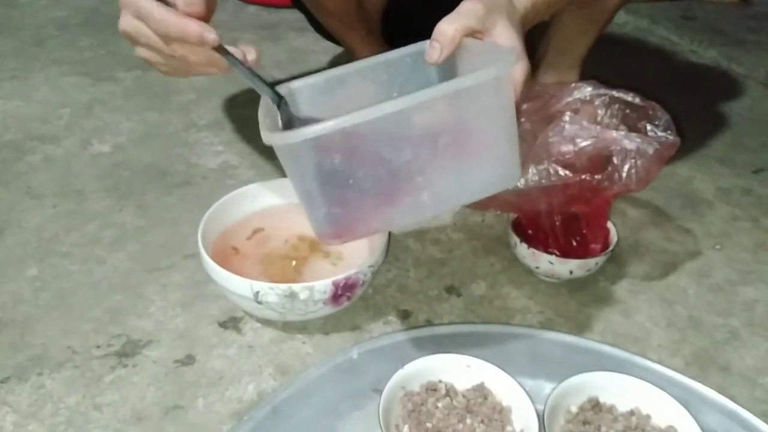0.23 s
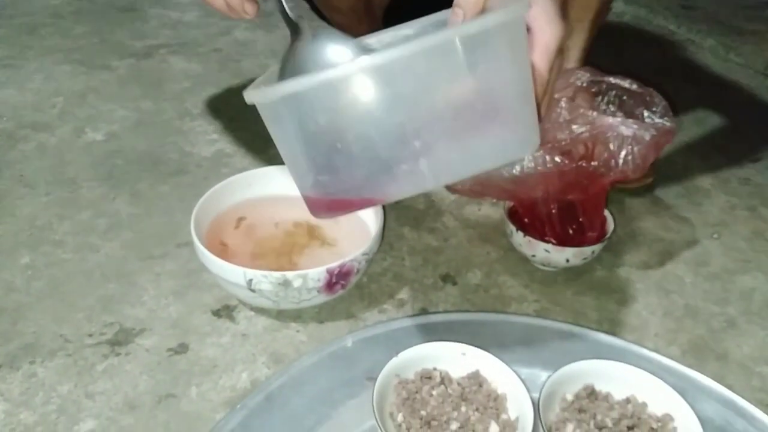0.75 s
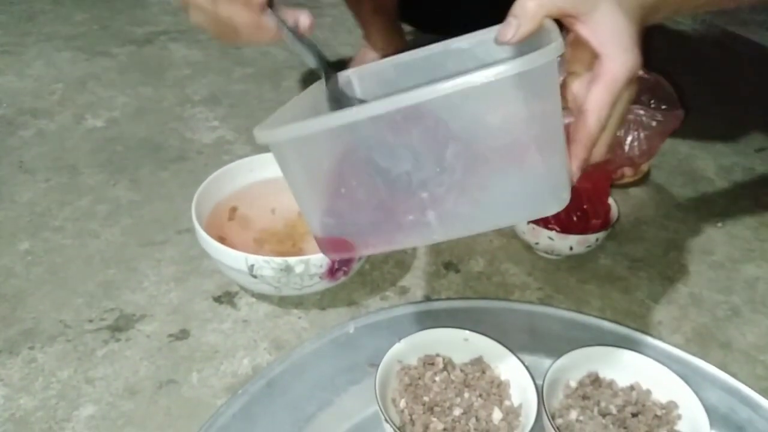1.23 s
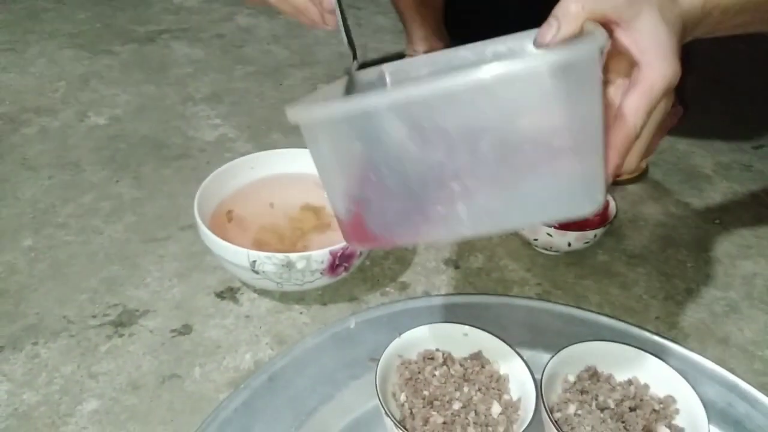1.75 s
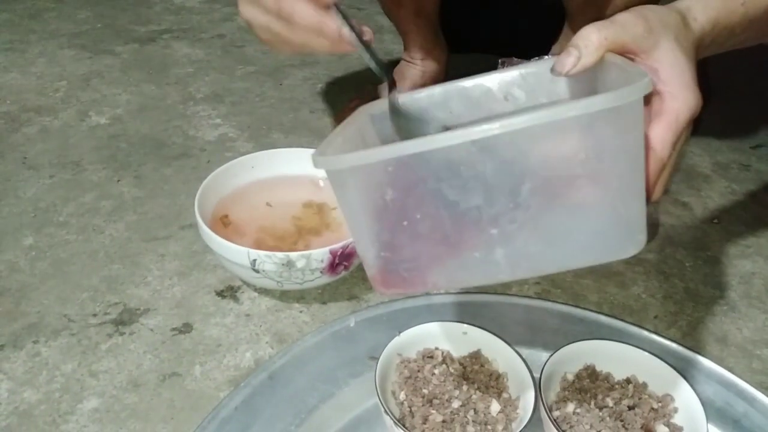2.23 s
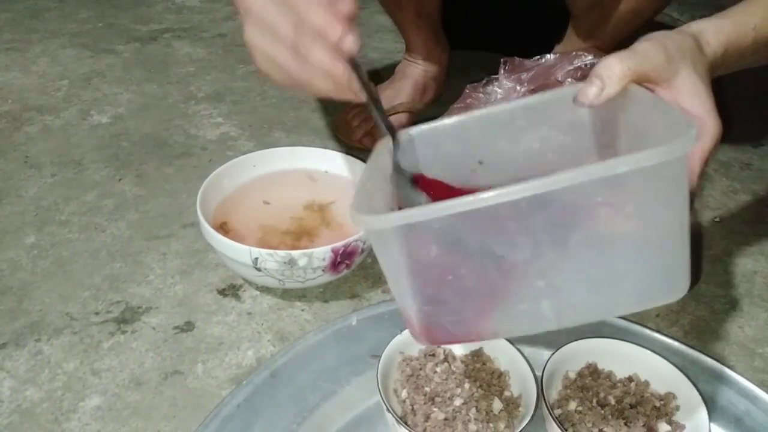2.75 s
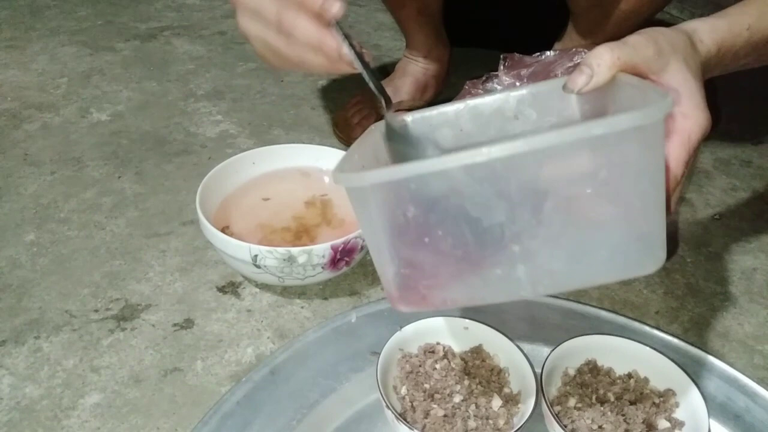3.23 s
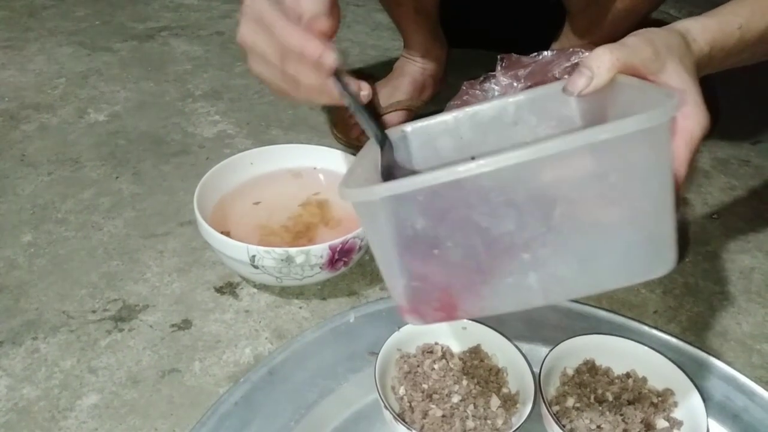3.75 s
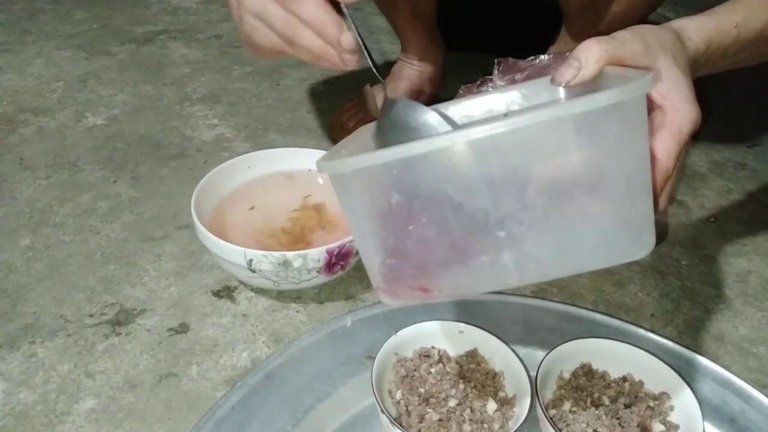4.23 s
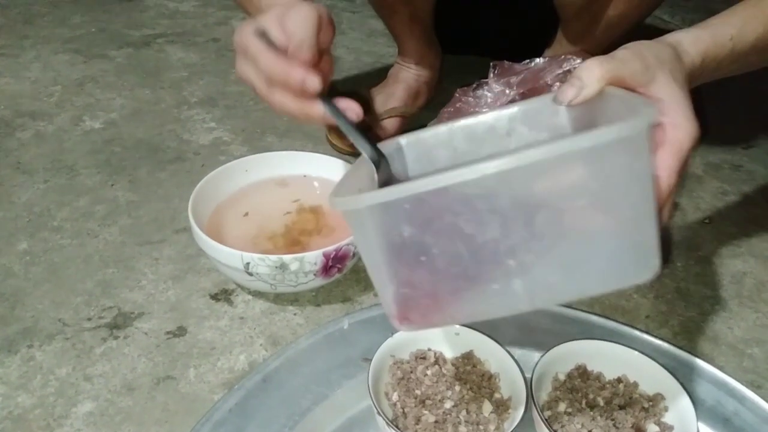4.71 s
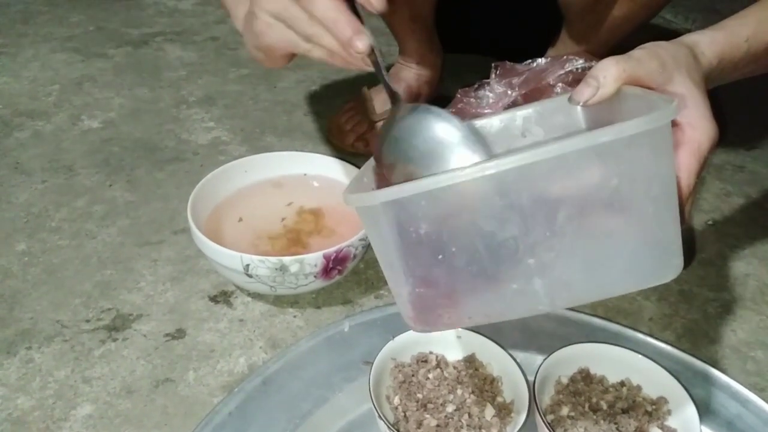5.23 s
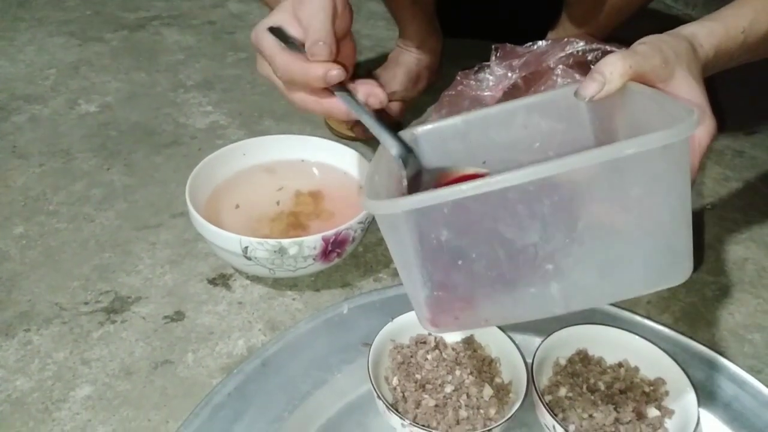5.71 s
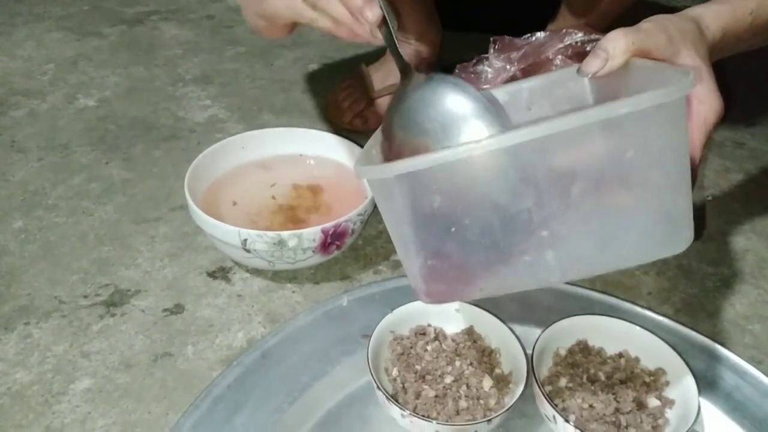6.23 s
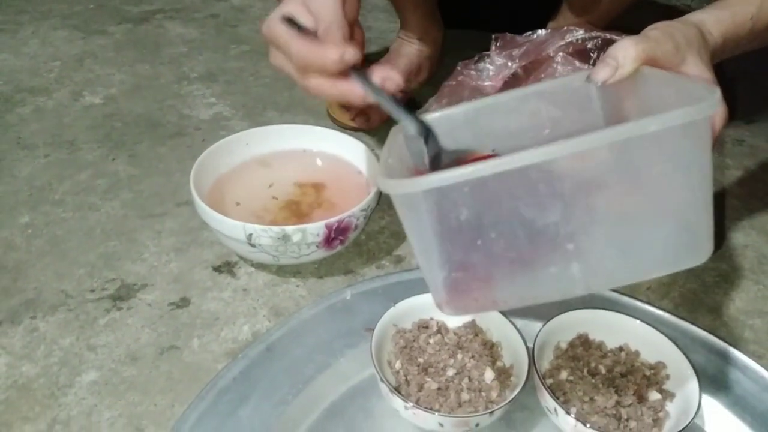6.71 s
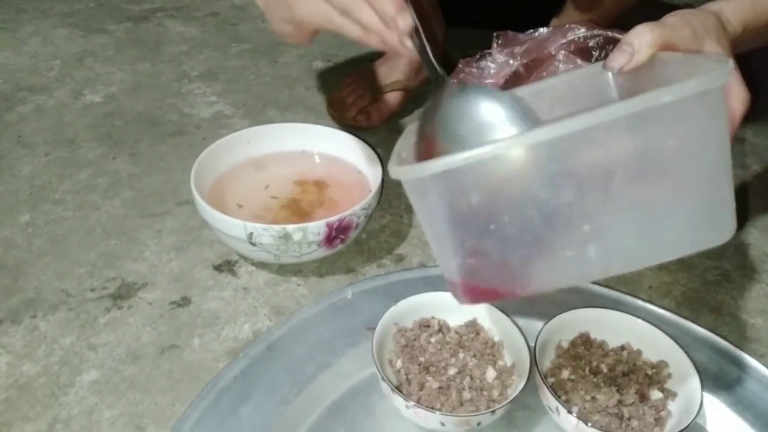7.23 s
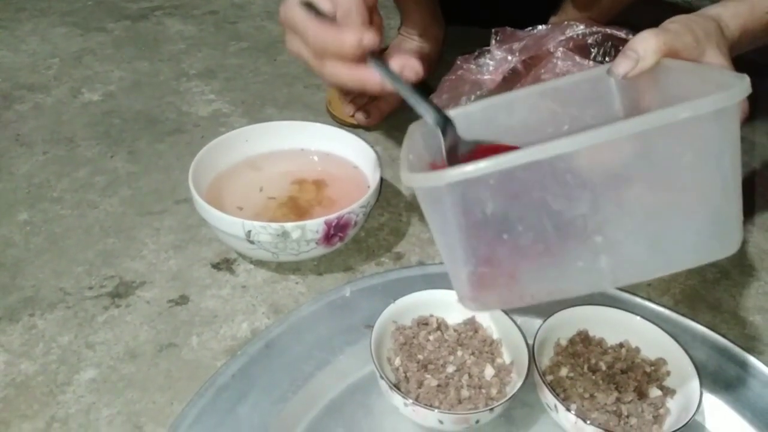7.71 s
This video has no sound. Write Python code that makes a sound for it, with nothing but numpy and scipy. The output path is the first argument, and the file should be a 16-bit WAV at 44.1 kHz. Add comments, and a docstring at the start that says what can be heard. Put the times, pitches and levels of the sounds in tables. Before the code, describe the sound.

Crickets chirr steadily behind the repeated hollow knocks, light clinks and soft scrapes of a steel spoon stirring liquid in a plastic container.

```python
"""A yard at night; crickets chirr from start to end. A steel spoon stirs red syrup in a hand-held
plastic tub, opening with a knock. Each turn, about a second long: the spoon scrapes along the wall,
taps twice, then knocks hard, flexing the wall with a low thump; nearby walls echo the knock.
After 1 s, air pockets plop in the syrup now and then, the last and loudest just after 5 s.
The stirring runs on to the end, near 8 s."""
import sys
import numpy as np
from scipy import signal
from scipy.fft import rfft, irfft, next_fast_len
from scipy.io import wavfile
from scipy.ndimage import map_coordinates

SR = 44100
rng = np.random.default_rng(int(sys.argv[2]) if len(sys.argv) > 2 else 0)


def store_pcm(level_fs):
    """Save levels as 16-bit WAV."""
    pcm = np.round(np.clip(level_fs, -1, 1) * 32767).astype(np.int16)
    wavfile.write(sys.argv[1], SR, np.atleast_2d(pcm).T)


N = 351464
TIME_S = np.arange(N) / SR
HIT_S = TIME_S[:SR // 3]  # time axis of one hit


# spoon's back on the wall: t/s, level/dB, nominal wall f/Hz
BUMPS = [(0.632, -22, 770), (2.445, -21.5, 724), (6.144, -26.5, 690), (7.081, -25, 643)]
# spoon's edge, one bounce: t/s, level/dB, nominal wall f/Hz, flight/s, bounce/dB re hit
RATTLES = [(0.722, -25.5, 630, 0.013, -3), (1.52, -24, 773, .026, -1.5), (2.541, -24, 605, .02, -6),
           (3.451, -24.5, 658, .029, -6), (4.31, -22.5, 644, .019, -6.5), (5.308, -23, 636, .026, -10.5),
           (6.273, -23, 776, 0.031, -1), (7.222, -22.5, 600, .029, -2.5)]
# hard knocks: t/s, level/dB, nominal wall f/Hz, click/dB
KNOCKS = [(0.008, -20.5, 667, -11.5), (0.879, -12, 643, -17), (1.779, -11.5, 628, -16),
          (2.68, -8, 666, -15.5), (3.589, -11, 640, -16.5), (4.515, -16, 660, -27.5),
          (5.446, -16.5, 643, -12.5), (5.458, -17, 623, -21), (6.399, -9, 653, -16),
          (7.357, -10, 647, -17.5)]
# loosely held spoon: t/s, level/dB, steel ring/dB
CLINKS = [(0.986, -30.5, -9.5), (2.779, -23.5, -8), (3.282, -27.5, -1), (3.721, -28, -7.5),
          (4.22, -21.5, -9), (4.639, -25, -12), (5.138, -31, -9)]
def spoon_hits():
    """Spoon on tub wall: soft bumps, bouncing taps, hard knocks, clinks on the rebound."""
    out = np.zeros((2, N))
    for t, db, hz in BUMPS:
        add(out, t, blow(db, hz, click_db=-17.5, steel_db=-15.5, thump_db=-15, snap_db=-41))
    for t, db, hz, flight_s, bounce_db in RATTLES:
        add(out, t, blow(db, hz, click_db=-10, steel_db=-18, thump_db=-12, snap_db=-27.5))
        bounce = blow(db + bounce_db, hz=645, click_db=-13.5, steel_db=-28, thump_db=-9.5, snap_db=-31)
        add(out, t + flight_s, bounce)
    for t, db, hz, click_db in KNOCKS:
        add(out, t, blow(db, hz, click_db, steel_db=-28, thump_db=-15, snap_db=-33))
    for t, db, steel_db in CLINKS:
        add(out, t, blow(db, hz=648, click_db=-16, steel_db=steel_db, thump_db=-14, snap_db=-29.5))
    return out


# modes before stretch: f/Hz, level/dB, t60/s
WALL_MODES = [(572, -2, 0.017), (651, 5.5, 0.034), (720, -12.5, 0.025), (985, -15.5, 0.04),
              (1090, -11, 0.018)]  # flexing wall
HOLLOW_MODES = [(508, -13, .13), (600, -9, .11), (648, 0, .17), (711, -6, .18), (762, -8, .17),
                (832, -13, .16), (927, -13, .15), (1118, -21, .12), (1368, -22, .16), (1577, -21, .14)]  # lingering hollow tones
THUMP_MODES = [(91.5, -8.5, .05), (179.1, -8, 0.18), (219, 14.5, 0.023), (216.6, -12.5, 0.21),
               (266, -2.5, 0.11), (282, -9.5, 0.025), (352.7, -9.5, .18)]  # low thump, with lingering low tones from the surrounding walls
RIM_MODES = [(1370, -5, .028), (1590, 0, .032), (1720, -5, .028), (1960, -2, .025), (2360, -1, .026),
             (2750, -2, .025)]  # stiff rim
STEEL_MODES = [(2900, -7, .02), (3120, -3, .022), (3300, 0, .035), (3460, -6, .022)]  # spoon, damped by hand and syrup
# noise spectra: f/Hz, level/dB
CRACK_SPECTRUM = [(400, -29), (900, 4.5), (1500, 3.5), (2600, 1.5), (3400, -1), (4300, -6.5), (5300, -16.5),
                  (6800, -17.5), (8500, -35), (15500, -39)]  # impact
FIZZ_SPECTRUM = [(2500, -18), (4200, -7), (5500, 5), (6800, 6.5), (8300, 2.5), (9300, -1.5), (10500, 2),
                 (12000, -7.5), (14000, -10), (15800, -19)]  # tearing syrup film; also in scrape and tick
def blow(db, hz, click_db, steel_db, thump_db, snap_db):
    """One blow cracks, rings rim and spoon, and flexes the wall with a low thump."""
    wall_stretch = (hz / 650) ** .9  # pitch depends on where the spoon lands
    wall = amp(-2.5) * ring(WALL_MODES, wall_stretch, attack_s=.0018, scatter_db=4.5)
    wall = signal.lfilter(*signal.butter(3, 470, 'high', fs=SR), wall)  # small wall radiates lows poorly
    hollow = amp(-10 + .074 * db) * ring(HOLLOW_MODES, stretch=.97, attack_s=.0091, scatter_db=3.5)
    thump = amp(thump_db + 1) * ring(THUMP_MODES, stretch=.99, attack_s=.0014, scatter_db=4)
    rim = stereo_ring(RIM_MODES, detune=.019, attack_s=.006, scatter_db=6.5)
    steel = stereo_ring(STEEL_MODES, detune=.012, attack_s=.0004, scatter_db=4)
    click = amp(click_db) * (amp(-2.5) * rim + amp(4.5) * splat(CRACK_SPECTRUM, t60_s=.016))
    clink = amp(steel_db - 4 - .17 * db) * steel  # hard blows press the spoon still
    snap = amp(snap_db + 3) * splat(FIZZ_SPECTRUM, t60_s=.022)
    impact = yard(wall + hollow + thump + click + snap, wet_db=-5.5, echo_db=.5)
    spoon = yard(clink, wet_db=-12.5, echo_db=-5)  # drier: bowl faces the microphone
    return amp(db - 2.5) * (impact + spoon)


# strokes along the wall: centre t/s, half length/s, rasp/dB, fizz/dB
STROKES = [(0.524, 0.2, -52, -70), (1.248, 0.046, -41.5, -57), (1.567, 0.14, -51, -67),
           (2.287, 0.054, -53.5, -66), (2.588, 0.064, -47.5, -55), (2.836, 0.082, -57.5, -72),
           (3.813, 0.34, -57.5, -73), (3.916, .036, -55.5, -60), (4.24, 0.046, -46.5, -56),
           (5.124, 0.15, -69, -72), (5.485, 0.1, -55.5, -69), (6.801, 0.041, -50, -57.5),
           (6.954, 0.047, -55, -73), (7.105, 0.057, -50.5, -56), (7.938, 0.047, -55.5, -75)]
# friction spectrum: f/Hz, level/dB
RASP_SPECTRUM = [(150, -35), (400, -2.5), (700, -3), (1050, -6), (1600, -2), (2300, 1), (3200, -6),
                 (4300, -2.5), (5400, -17.5), (6800, -8), (8500, -24), (12000, -30.5)]
def scrape():
    """Steel slips on wet plastic and tears the sticky film; both swell with each stroke."""
    rasp_power, fizz_power = np.zeros((2, N))
    for t, half_s, rasp_db, fizz_db in STROKES:
        pressure = (1 + ((TIME_S - t) / half_s) ** 2 / 4) ** -4
        rasp_power += amp(rasp_db) ** 2 * pressure
        fizz_power += amp(fizz_db) ** 2 * pressure
    slips = amp(.58 * wobble(890) + .79 * wobble(60))
    pops = rng.random(N) < 22 / SR  # about 22 per s
    film = amp(.92 * wobble(450)) + amp(18.5) * pops
    rasp = amp(4) * np.sqrt(rasp_power) * noise(RASP_SPECTRUM, grain=slips)
    fizz = amp(6.5) * np.sqrt(fizz_power) * noise(FIZZ_SPECTRUM, grain=film)
    return rasp + fizz


# singing slides: centre t/s, Gaussian width/s, f/Hz, level/dB
SLIDES = [(0.345, .013, 2460, -53.5), (0.603, .008, 1940, -43), (1.14, .07, 1440, -56),
          (2.501, 0.027, 4180, -47.5), (2.585, 0.063, 3390, -47), (2.62, 0.049, 4300, -51),
          (3.905, 0.034, 1955, -46), (4.162, 0.051, 1966, -48), (5.011, 0.0074, 1610, -56),
          (5.798, 0.009, 1810, -50), (6.795, 0.032, 1964, -48), (6.9, .004, 1490, -49.5),
          (7.084, 0.025, 1600, -48.5)]
def slides():
    """The sliding bowl sings briefly; uneven friction smears the tone into a narrow band."""
    out = np.zeros((2, N))
    offset_s = HIT_S - HIT_S.mean()
    for t, width_s, hz, db in SLIDES:
        white = rng.standard_normal((2, 2, len(HIT_S)))
        flutter = unit_rms(filtered(white, lambda f: 1 / (1 + (f / 110) ** 2)))
        phase = 2 * np.pi * hz * offset_s
        tone = flutter[0] * np.cos(phase) + flutter[1] * np.sin(phase)
        add(out, t - HIT_S.mean(), amp(db) * tone * np.exp(-(offset_s / width_s) ** 2 / 2))
    return out


# edge ticks: t/s, level/dB, f/Hz, sharpness/dB
TICKS = [(0.259, -37, 1890, -19), (0.4352, -31, 2410, -17), (0.5926, -31, 2030, -28),
         (1.3066, -29.5, 2790, -16.5), (1.475, -33, 2360, -34), (1.6562, -31.5, 1980, -30),
         (2.2298, -35.5, 1620, -17), (3.162, -36, 3360, -20), (4.0422, -36, 1980, -31.5),
         (4.9856, -35, 2060, -24), (5.1005, -39, 1585, -13.5), (7.888, -31, 2355, -26)]
def ticks():
    """Clear ticks of the spoon's edge, plus eight faint ones at random."""
    out = np.zeros((2, N))
    for t, db, hz, sharp_db in TICKS:
        add(out, t, tick(db, hz, sharp_db))
    for t in rng.uniform(0, N / SR, size=8):
        add(out, t, tick(db=-47.5, hz=rng.uniform(1700, 3600), sharp_db=-27))
    return out


# edge click spectrum: f/Hz, level/dB
TICK_SPECTRUM = [(300, -14), (700, 3), (1200, -6), (2300, 2.5), (3500, -2), (5500, -14), (7000, -12.5),
                 (9000, -40.5), (15500, -41)]
def tick(db, hz, sharp_db):
    """The edge catches on the plastic without flexing it."""
    ping = amp(-2.5) * unit_burst(np.sin(2 * np.pi * hz * HIT_S) * decay(t60_s=.041))
    click = splat(TICK_SPECTRUM, t60_s=.018)
    snap = amp(sharp_db + 11.5) * splat(FIZZ_SPECTRUM, t60_s=.017)
    return yard(amp(db - 10) * (click + ping + snap), wet_db=-2.5, echo_db=3)


# syrup gulps: t/s, level/dB, base f/Hz
PLOPS = [(1.066, -33, 235), (1.468, -41.5, 135), (2.191, -42.5, 346), (5.097, -28, 243)]
# bubbles per gulp: delay/s, level/dB, f/base f
BUBBLES = [(0, -2, 0.94), (.021, -1, .68), (.052, -12, .62)]
def plops():
    """Syrup gulps back into the corner: ever larger bubbles, falling pitch."""
    out = np.zeros((2, N))
    for t, db, hz in PLOPS:
        for delay_s, step_db, ratio in BUBBLES:
            add(out, t + delay_s, bubble(db + step_db, hz * ratio))
    return out


def bubble(db, hz):
    """An air pocket gulps in the thick syrup, which slaps the wall."""
    gulp = np.sin(2 * np.pi * hz * HIT_S) * decay(t60_s=.093)
    slap = amp(-5.5) * np.sin(2 * np.pi * 1.7 * hz * HIT_S) * decay(t60_s=.066)
    wall = amp(-13) * ring(WALL_MODES, stretch=.85, attack_s=.002, scatter_db=2)
    return yard(amp(db) * np.array([gulp + slap + wall] * 2), wet_db=-5, echo_db=-6.5)


# wall echoes: delay/s, level/dB
ECHOES = [(.0169, -10), (.0292, -21), (.0462, -22), (.0662, -22)]
# diffuse decay: f/Hz, t60/s
YARD_T60 = [(150, 0.51), (350, 0.49), (700, 0.32), (2200, 0.44), (6000, 0.29), (14000, 0.25)]
def yard(x, wet_db, echo_db):
    """Direct sound, echoes and tail: rough walls mirror the lows and scatter the highs."""
    hz, t, bands = signal.stft(noise([(20, 0), (20000, 0)], size=SR // 2), SR, nperseg=256)
    envelope = amp(-60 * t / along(YARD_T60, hz)[:, None]) * (1 - np.exp(-t / .00077))
    tail = signal.istft(bands * envelope, SR, nperseg=256)[1]
    tail /= np.linalg.norm(tail[0])
    echoes = np.zeros(tail.shape[-1])
    for delay_s, db in ECHOES:
        echoes[round(delay_s * SR)] += amp(db + echo_db)
    scattered = filtered(tail, lambda f: amp(wet_db + along([(200, 1), (650, -1.35), (1800, -.16)], f)))
    impulse = scattered + filtered(echoes, lambda f: 1 / (1 + 1j * f / 2600))
    impulse[:, 0] += 1  # direct path
    return signal.fftconvolve(x, impulse, axes=1)


# cricket's pace: t/s, chirp count
CHIRP_PACE = [(-.068, -1), (2.7, 25), (4.768, 45), (7.97, 75)]
# chirp spectrum: f/Hz, level/dB
CHIRP_SPECTRUM = [(4000, -92), (5200, -49), (6100, -21.5), (6600, -12), (6720, -6), (6790, 3.5),
                  (6850, -12), (6915, 3.5), (6980, -4.5), (7120, 1), (7280, -8), (7560, -8.5), (7700, -31),
                  (9500, -92)]
def near_cricket():
    """One cricket pulses on the left; the upper band leads, so each chirp falls in pitch."""
    cycle = np.interp(TIME_S, *np.transpose(CHIRP_PACE))
    swell = lambda lead_cycles: amp(6.6 * np.cos(2 * np.pi * (cycle + lead_cycles)))
    song = noise(CHIRP_SPECTRUM, grain=amp(1.6 * wobble(200)))
    upper = filtered(song, lambda hz: np.interp(hz, [6800, 7400], [0, 1]))
    chirps = unit_rms(upper * swell(.12) + (song - upper) * swell(-.042))
    pan = amp([[1.5], [-1.5]])
    return amp(-55 + .53 * wobble(3.77)) * chirps * pan


# rests in the trill: t/s
TRILL_RESTS = [.09, .31, 1.43, 1.93, 2.15, 2.95, 3.78]
# insect spectra: f/Hz, level/dB
TRILL_SPECTRUM = [(2500, -80), (4350, -13.5), (4700, -5.5), (4900, -9.5), (5200, -19), (7000, -82)]
CHORUS_SPECTRUM = [(700, -69), (1400, -22), (2200, -2.5), (3000, -5), (4100, -8.5), (5300, -11.5),
                   (6200, -4.5), (7000, 4.5), (7600, -2), (8300, -24.5), (11000, -20.5), (15800, -70)]
def far_crickets():
    """A lower trill with brief rests, over a distant chorus."""
    resting = np.exp(-((TIME_S - np.array(TRILL_RESTS)[:, None]) / .036) ** 2).sum(0)
    trill = noise(TRILL_SPECTRUM) * amp(-60.5 + 2.7 * wobble(12) - 14 * resting)
    chorus = noise(CHORUS_SPECTRUM) * amp(-56 + .7 * wobble(6))
    return trill + chorus


# open-air spectrum: f/Hz, level/dB
AIR_SPECTRUM = [(20, 5.5), (45, -5.5), (100, -6.5), (170, -10.5), (300, -7), (400, -18.5), (620, -15.5),
                (1000, -32.5), (1600, -34.5), (4000, -28), (9000, -47), (12000, -43.5), (15800, -48)]
def night_air():
    """Low, wavering murmur of the open air."""
    return amp(-51.5 + 1.25 * wobble(13)) * noise(AIR_SPECTRUM)


# stereo likeness: f/Hz, left-right correlation
CORRELATION = [(30, .35), (100, .8), (600, .8), (1200, .25), (2500, 0), (15000, 0)]
def noise(spectrum, size=N, grain=1):
    """Coloured stereo noise, rms 1, correlated in the lows only."""
    def mid_side_gain(hz):
        angle = np.arccos(np.clip(along(CORRELATION, hz), -1, 1)) / 2
        return amp(along(spectrum, hz)) * [np.cos(angle), np.sin(angle)]
    mid, side = filtered(rng.standard_normal((2, size)) * grain, mid_side_gain)
    return unit_rms(np.array([mid + side, mid - side]))


def splat(spectrum, t60_s):
    """Short burst of coloured noise, 1 ms attack."""
    return unit_burst(noise(spectrum, size=len(HIT_S)) * decay(t60_s) * (1 - np.exp(-HIT_S / .001)))


def ring(modes, stretch, attack_s, scatter_db):
    """Damped modes at f * stretch, with new random strengths per strike."""
    hz, db, t60_s = np.transpose(modes)[:, :, None]
    level = amp(db + scatter_db * rng.standard_normal(hz.shape)) * decay(t60_s)
    tone = (level * np.sin(2 * np.pi * hz * stretch * HIT_S)).sum(0)
    return unit_burst(tone * (1 - np.exp(-(HIT_S / attack_s) ** 2)))


def stereo_ring(modes, detune, attack_s, scatter_db):
    """Short waves radiate unevenly: a separate ring per channel."""
    return np.array([ring(modes, 1 + detune * rng.standard_normal(), attack_s, scatter_db)
                     for _ in range(2)])


def decay(t60_s):
    """Exponential decay of one hit."""
    return amp(-60 * HIT_S / t60_s)


def amp(db):
    """dB to gain."""
    return 10 ** (np.asarray(db) / 20)


def unit_rms(x):
    """Scale to rms 1."""
    return x / np.sqrt(np.mean(x ** 2) + 1e-20)


def unit_burst(x):
    """Scale to the energy of 5 ms at rms 1."""
    return unit_rms(x) * np.sqrt(.005 * SR / x.shape[-1])


def along(points, hz):
    """Interpolate (f/Hz, value) points on a log axis."""
    f, value = np.transpose(points)
    return np.interp(np.log(hz + 1), np.log(f + 1), value)


def wobble(knots_per_s):
    """Smooth random curve."""
    return map_coordinates(rng.standard_normal(int(N * knots_per_s / SR) + 4), [TIME_S * knots_per_s])


def filtered(x, response):
    """Apply response(f/Hz) by FFT."""
    n = x.shape[-1]
    padded = next_fast_len(n + SR // 8)
    return irfft(rfft(x, padded) * response(np.fft.rfftfreq(padded, 1 / SR)), padded)[..., :n]


def add(track, start_s, sound):
    """Mix sound into track."""
    start = max(round(start_s * SR), 0)
    track[:, start:start + sound.shape[-1]] += sound[..., :N - start]


def scene():
    """Tub in front, insects all around."""
    stirring = spoon_hits() + ticks() + plops() + scrape() + slides()
    return stirring + near_cricket() + far_crickets() + night_air()


# microphone port balance: f/Hz, left minus right/dB
PORT_BALANCE = [(100, .5), (200, 2.4), (600, 1), (1100, 1), (1700, 6.5), (2600, 5.5), (3800, 2), (5000, 6),
                (7000, 12.5), (8000, 4), (9500, -11.5), (11000, -8.5), (14000, 3.5)]
def record(dry):
    """Two microphone ports: unequal colour, right slightly early, band-limited."""
    right_lead_s, top_hz = .000094, 15800
    def response(hz):
        colour = amp(np.outer([.5, -.5], along(PORT_BALANCE, hz)))
        lead = np.exp(1j * np.pi * np.outer([-1, 1], hz) * right_lead_s)
        return colour * lead * (hz < top_hz)
    return filtered(dry, response)


dry = scene()
out = record(dry)
store_pcm(out)
```